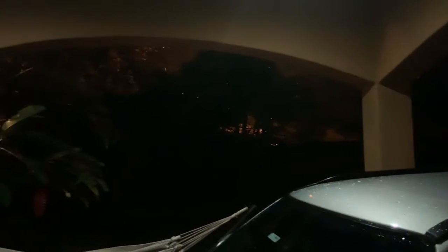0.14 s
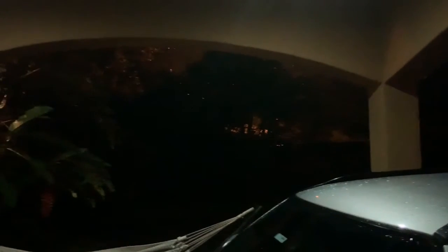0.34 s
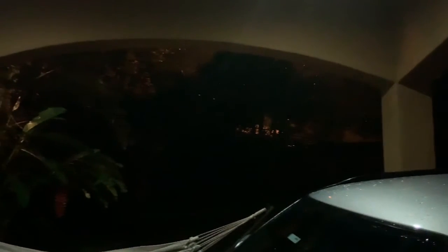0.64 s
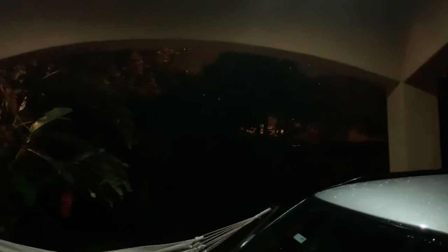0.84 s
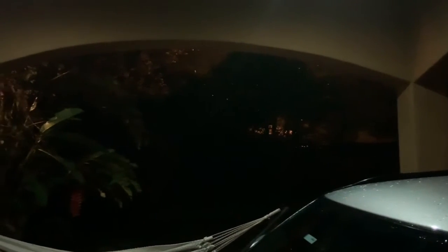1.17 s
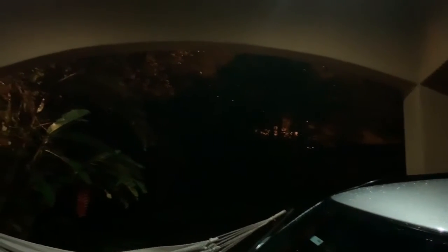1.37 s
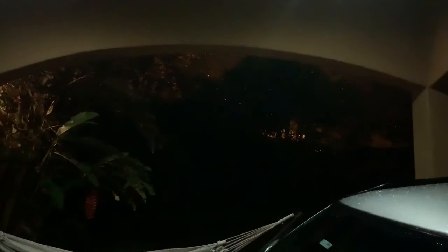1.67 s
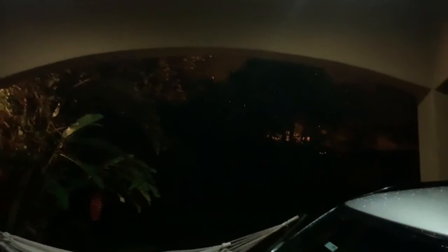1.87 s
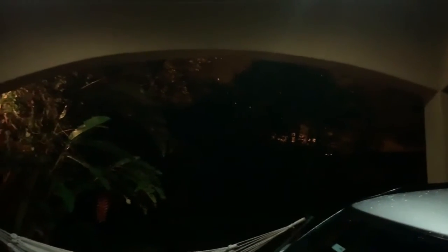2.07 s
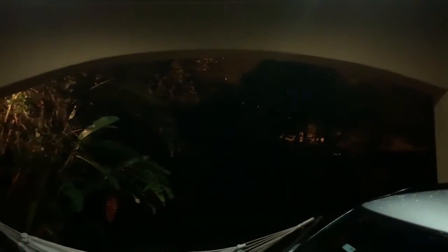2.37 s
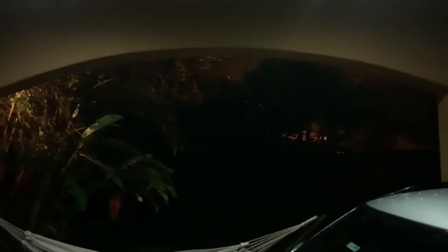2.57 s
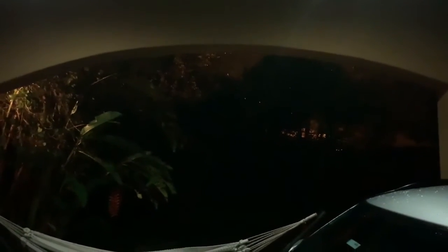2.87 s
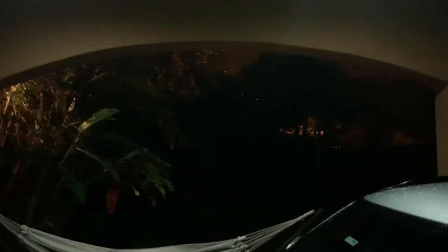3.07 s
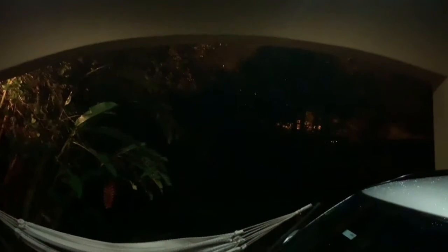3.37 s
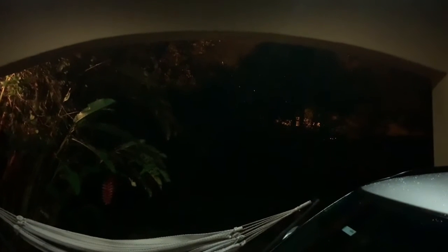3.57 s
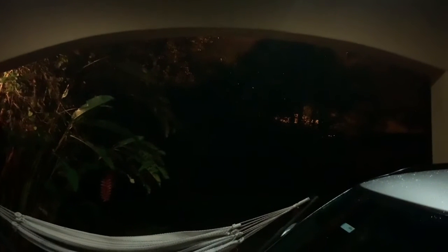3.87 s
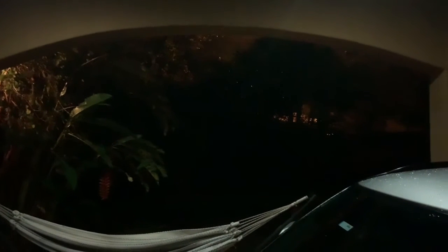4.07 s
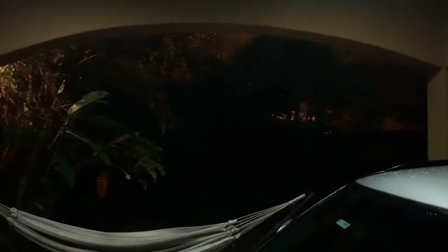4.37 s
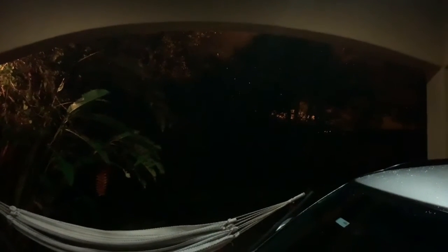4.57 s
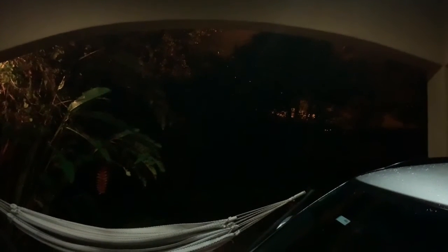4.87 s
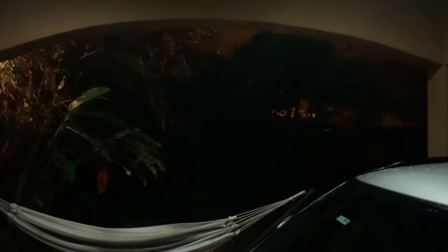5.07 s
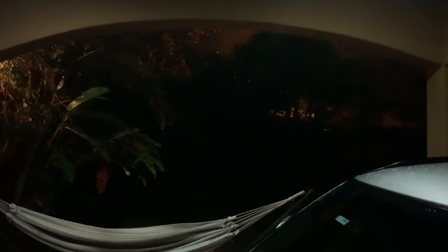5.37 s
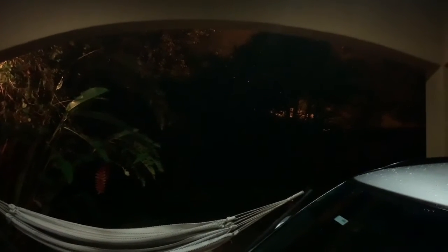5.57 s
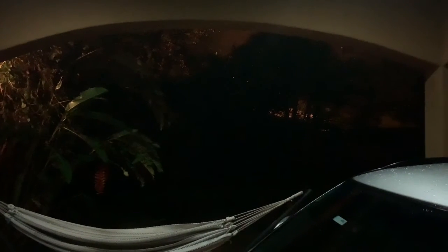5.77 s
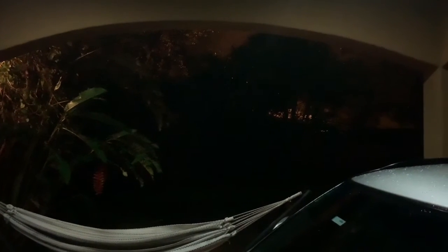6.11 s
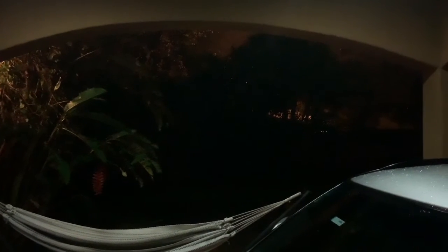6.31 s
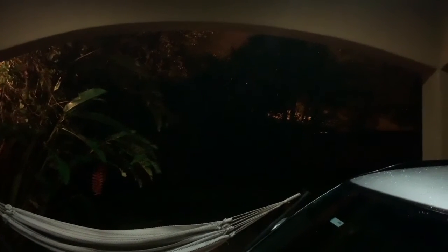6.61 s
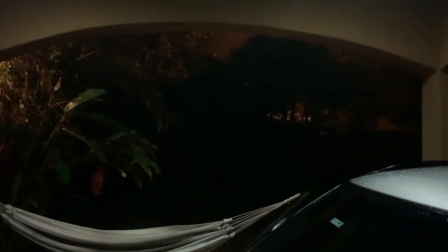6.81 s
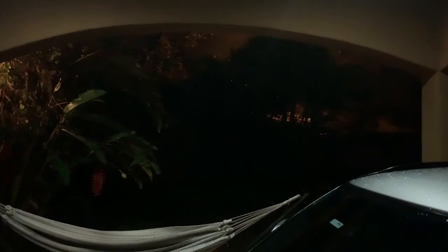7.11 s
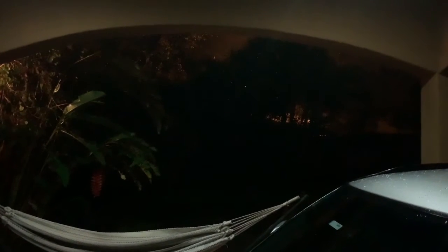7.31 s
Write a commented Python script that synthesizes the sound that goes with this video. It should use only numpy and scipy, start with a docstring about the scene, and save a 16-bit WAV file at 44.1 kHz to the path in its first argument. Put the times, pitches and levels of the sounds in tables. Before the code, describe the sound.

Throughout about 7.5 seconds, a handful of night insects trill without pause in a garden beside a hard-walled porch. The sound is a shrill, rough buzz near 6 kHz with a fainter glassy octave above, pulsing about 133 times a second; the singers' rates slide apart and meet, so the chorus shimmers and beats. It leans a little to the right, blurred by leaves and short porch echoes, with fainter singers far behind. Underneath are very quiet airy hiss, a distant traffic-like rumble and barely audible low wavering hums. Faint ticks fall at 1.5, 2.0 and 2.2 seconds. At 2.65 a small, hollow knock rattles briefly, followed by a light snap at 2.93. Sparse dull and thin high ticks continue from 3.3 to 7.3, clearest near 5.1. The rumble swells gently around 4.9, then eases. A very faint double knock comes at 7.0; the trill carries on to the end.

```python
"""Five insects buzz in a garden at night, heard from a hard-walled porch, with three more farther off.
Each clicks about 133 times a second into a body ringing near 6 kHz; their rates drift apart and meet again.
Under them: a far rumble and hiss of filtered noise, and faint gliding sine tones.
Two knocks, one snap and a few small ticks are bursts of dying modes with porch echoes."""
import sys
import numpy as np
from scipy import signal
from scipy.fft import rfft, irfft, next_fast_len
from scipy.io import wavfile
from scipy.ndimage import uniform_filter1d

SR = 44100
rng = np.random.default_rng(int(sys.argv[2]) if len(sys.argv) > 2 else 0)


def transcribe(signal):
    """Save signal, clipped to [-1, 1], as a 16-bit WAV file at the path in sys.argv[1]."""
    frames = np.atleast_2d(signal).T
    limited = np.clip(frames, -1, 1)
    pcm = np.round(limited * 32767).astype(np.int16)
    wavfile.write(sys.argv[1], SR, pcm)


N = 328545
SIZE = next_fast_len(N + SR)  # room for the echoes to die away
HZ = np.fft.rfftfreq(SIZE, 1 / SR)
T = np.arange(N) / SR

# colour of one click, a main ring and its octave: (f/Hz, relative level/dB)
CLICK_COLOUR = [(4400, -46.5), (5050, -25), (5260, -15.5), (5450, -9), (5800, -3), (6100, -1.5), (6300, 5),
                (6500, 2), (6750, -1.5), (7050, -17), (7600, -26), (9200, -39), (10300, -51.5),
                (11300, -37.5), (12300, -25.5), (13300, -31), (14200, -51.5)]
# echoes against straight sound: (f/Hz, level/dB)
ECHO_SHARE = [(4700, -1), (5200, -7), (5500, -2), (6100, 4), (7000, 0), (9000, -2), (12400, -8)]


def gain_of(db):
    """Decibels to an amplitude factor."""
    return 10 ** (np.asarray(db) / 20)


def evened(x):
    """Scales to rms 1."""
    return x / np.sqrt(np.mean(x ** 2) + 1e-20)


def read(points, hz):
    """A spectrum, straight on a log frequency axis."""
    f, value = np.transpose(points)
    return np.interp(np.log(hz + 1), np.log(f + 1), value)


def over_time(points):
    """A curve over time, straight between its points."""
    return np.interp(T, *np.transpose(points))


def wander(top_hz):
    """Slow chance of rms 1: sines of random phase up to top_hz, the slower ones stronger."""
    t = T[::64]
    slow = 0
    for f in np.geomspace(top_hz / 20, top_hz, num=16):
        slow = slow + np.sin(2 * np.pi * (f * t + rng.random())) / np.sqrt(f)
    return np.interp(T, t, evened(slow))


def echoes(t60, first_s):
    """Spectrum of dying scattered echoes of energy 1, other ones for each port."""
    t = np.arange(SR // 2) / SR
    tail = rng.standard_normal((2, len(t))) * gain_of(-60 * t / t60) * (t > first_s)
    return rfft(tail / np.linalg.norm(tail, axis=1, keepdims=True), SIZE)


def left_port_path(hz):
    """Delay and phase of the straight path at the left port, against the right."""
    lag_s = 33 / SR  # the garden lies to the right: the left port hears it later
    # the housing turns the phase of the far port: (f/Hz, phase/rad)
    port_turn = [(1400, 1.5), (2760, .7), (4130, 3.2), (5300, 2.6), (7050, 2.1), (9000, 0)]
    return np.exp(-2j * np.pi * hz * lag_s + 1j * read(port_turn, hz))


def rumble():
    """Low noise that swells like far traffic; nearly the same at both ports."""
    # slow swell: (t/s, level/dB)
    swell = [(0, -58), (1.6, -58.5), (2.2, -62.5), (3.4, -55), (4.2, -52.5), (4.9, -47), (5.4, -51),
             (5.8, -50.5), (7.0, -54.5), (7.45, -53.5)]
    # colour: (f/Hz, relative level/dB)
    colour = [(12, -40), (20, -35), (47, -0.5), (76, -1), (92, -1.5), (118, -8.5), (200, -20), (260, -47),
              (440, -120)]
    gust_db, gust_hz = 0.5, 9.6  # the rumble comes in lumps
    a, b = rng.standard_normal((2, SIZE))
    pair = rfft(np.array([a + 0.12 * b, a - 0.066 * b]))
    low = irfft(pair * gain_of(read(colour, HZ)) * (HZ < 200), SIZE)[:, :N]
    return evened(low) * gain_of(over_time(swell) + gust_db * wander(gust_hz))


def tones():
    """Sines that each glide in pitch, waver in pitch and level, and fade in and out."""
    # glides: (start t/s, end t/s, start f/Hz, end f/Hz, rms pitch waver/Hz, level/dB)
    glides = [(0, 3.3, 127, 120, 5, -66), (1.1, 2.7, 290, 270, 4, -73), (3.3, 4.3, 335, 370, 3, -76),
              (3.7, 4.25, 117, 122, 1.5, -59), (4.2, 4.65, 124, 132, 2, -65), (4.8, 5.9, 246, 240, 2, -73),
              (4.9, 6.3, 188, 182, 2, -70), (3.9, 4.8, 300, 330, 3, -75), (4.2, 7.1, 225, 200, 2, -72),
              (5.4, 5.85, 87, 85, 2, -56), (5.85, 6.7, 90, 85, 5, -62), (6.84, 6.98, 1750, 1400, 120, -68)]
    out = np.zeros(N)
    for start, end, from_hz, to_hz, width, db in glides:
        hz = np.interp(T, (start, end), (from_hz, to_hz)) + width * wander(top_hz=5 * width)
        fade = np.clip(np.minimum(T - start, end - T) / (end - start) * 5, 0, 1)
        sine = np.sqrt(2) * np.sin(2 * np.pi * np.cumsum(hz) / SR)
        out += gain_of(db + 5.2 * wander(top_hz=6.6)) * fade * sine
    return out


def night():
    """Broad hiss, filtered noise of level uneven over time and frequency, partly from the garden side."""
    # colour: (f/Hz, relative level/dB)
    colour = [(90, -5), (150, 0), (250, -5.5), (480, -10), (900, -11.5), (1600, -10.5), (2300, -14.5),
              (3600, -18), (4250, -18), (4600, -7), (5200, -9), (8000, -9.5), (9300, -12), (10200, -17),
              (13500, -34), (14200, -7), (15600, -41)]
    # how alike the two ports are: (f/Hz, likeness 0-1)
    likeness = [(100, 0.81), (300, 0.84), (500, 0), (950, 0.6), (1200, 0.46), (1700, 0.46), (2900, 0.71),
                (3500, 0), (10000, 1)]
    level_db = -51.5
    frames, hz = N // 256 + 5, np.fft.rfftfreq(1024, 1 / SR)
    a, b, c, d, uneven = rng.standard_normal((frames, 513, 5)).T
    uneven = uniform_filter1d(uneven, 14, axis=0)  # across frequency
    uneven = evened(uniform_filter1d(uneven, 12, axis=1))  # across time
    flicker = evened(uniform_filter1d(rng.standard_normal(frames), 6))
    same = np.clip(read(likeness, hz), 0, 1)[:, None]
    late = np.where(hz > 1100, left_port_path(hz), 1)[:, None]  # the bass comes from all round
    right = a + 1j * b
    left = same * late * right + np.sqrt(1 - same ** 2) * (c + 1j * d)
    low_cut_db = 40 * (hz < 60)[:, None]
    shape_db = read(colour, hz)[:, None] + 1.8 * uneven + .8 * flicker - low_cut_db
    z = np.array([left, right]) * gain_of(shape_db)
    return gain_of(level_db) * evened(signal.istft(z, nperseg=1024, noverlap=768)[1][:, :N])


def struck(blows, rise_s):
    """Spectrum of blows (t/s, peak/dB, modes), each a sum of dying sines."""
    t, out = np.arange(2000) / SR, np.zeros(SIZE)
    for s, db, modes in blows:
        ring = np.zeros(len(t))
        for k, (f, width, mode_db) in enumerate(modes):
            dying = np.sin(2 * np.pi * f * t) * np.exp(-np.pi * width * t)
            ring += (-1) ** k * gain_of(mode_db) * dying
        ring *= 1 - np.exp(-t / rise_s)
        out[round(s * SR):][:len(t)] += gain_of(db) * ring / abs(ring).max()
    return rfft(out)


def taps():
    """Knocks, a snap and ticks ring their modes, each with its own share of porch echoes."""
    # a knock and its rattle, then a faint one: (t/s, peak/dB)
    knocks = [(2.645, -31.5), (2.652, -42), (2.663, -37.5), (2.678, -47), (2.69, -39.5), (2.705, -47),
              (2.722, -42), (7.012, -49), (7.027, -48.5), (7.044, -59)]
    # knock modes: (f/Hz, width/Hz, relative level/dB)
    knock_modes = [(307, 65, -19), (720, 190, -3.5), (920, 103, -3.5), (1470, 245, -2), (2310, 600, -2.5),
                   (2900, 550, 1), (4150, 630, -2)]
    # the snap: (t/s, peak/dB)
    snaps = [(2.9315, -41), (2.9345, -44), (2.9385, -43)]
    # snap modes: (f/Hz, width/Hz, relative level/dB)
    snap_modes = [(950, 250, -12), (1580, 300, -11), (2310, 160, -4), (2750, 130, 1), (3410, 500, -5),
                  (4160, 150, -6), (4560, 90, -3)]
    # dull ticks, some mostly echo: (t/s, peak/dB, f/Hz, echo blow over dry blow/dB)
    ticks = [(1.476, -48, 1490, 12), (2.229, -46, 889.5, 10), (3.308, -44, 1800, 9), (4.324, -43, 2060, 5),
             (6.3166, -43, 1360, 1), (6.439, -48.5, 1520, 10.5)]
    # thin high ticks: (t/s, peak/dB)
    pings = [(2.0328, -36), (4.126, -47), (4.2694, -41), (5.1362, -34), (5.1994, -42), (6.628, -43),
             (7.3416, -40)]
    # thin tick modes: (f/Hz, width/Hz, relative level/dB)
    ping_modes = [(10000, 900, -9), (12200, 700, -4), (13400, 450, 0), (14500, 450, 1), (15500, 600, -2)]
    tick_width_hz = 930
    knock_echo_db, snap_echo_db, ping_echo_db = 5.5, -2, 8  # echoes over straight sound

    porch = echoes(t60=.2, first_s=.002)
    knock = struck([(*row, knock_modes) for row in knocks], rise_s=0.00099)
    snap = struck([(*row, snap_modes) for row in snaps], rise_s=.001)
    ping = struck([(*row, ping_modes) for row in pings], rise_s=0.00017)
    dry_ticks, echo_ticks = [], []
    for s, db, hz, echo_db in ticks:
        dry_ticks.append((s, db, [(hz, tick_width_hz, 0), (2 * hz, tick_width_hz, -3)]))
        echo_ticks.append((s, db + echo_db, [(hz, tick_width_hz, 0)]))
    out = knock * (1 + gain_of(knock_echo_db) * porch)
    out += snap * (1 + gain_of(snap_echo_db) * porch)
    out += struck(dry_ticks, rise_s=0.00086)
    out += struck(echo_ticks, rise_s=0.00014) * porch
    out += ping * (1 + gain_of(ping_echo_db) * porch)
    return irfft(out, SIZE)[:, :N]


def clicks(rate, jitter, uneven_db):
    """A band-limited click at every turn; each a little early or late (in turns), strong or weak."""
    chance = rng.standard_normal((1100, 2))  # a row for each click
    turns = np.cumsum(rate) / SR + rng.random()
    turns = turns + jitter * np.interp(turns, np.arange(1100), chance[:, 0])
    angle = np.pi * ((turns + .5) % 1 - .5) + 1e-9
    pulse = np.sin(301 * angle) / np.sin(angle)  # 150 equal harmonics
    return pulse * gain_of(uneven_db * chance[np.round(turns).astype(int), 1])


def stirring():
    """Shares of three sets of echo paths, fading into each other as air and leaves stir; powers sum to 1."""
    stir_hz, steady = 4.0, 1.2  # top speed of the changes; weight of the set that stays, before scaling
    weights = np.array([steady * np.ones(N), wander(stir_hz), wander(stir_hz)])
    return weights / np.linalg.norm(weights, axis=0)


def ongoing(train, rate):
    """Spectrum of a song that began earlier: its first clicks also wrap round to just before time zero."""
    before = train[:round(20 * SR / rate)]
    return rfft(np.concatenate([train, np.zeros(SIZE - N - len(before)), before]))


def far_insects():
    """Spectrum of the distant singers: click trains heard by echoes alone."""
    count, level_db, rate_hz = 3, -56, 133.5  # level of each, before the click colour and echo path
    share, body = gain_of(read(ECHO_SHARE, HZ)), gain_of(read(CLICK_COLOUR, HZ))
    song = 0
    for _ in range(count):
        train = evened(clicks(rate_hz + 1.6 * wander(top_hz=.6), jitter=0.001, uneven_db=4))
        path = echoes(t60=0.42, first_s=0) * share / share.max()
        song = song + gain_of(level_db) * rfft(train, SIZE) * path * body
    return song


def near_insects():
    """Spectrum of the near singers: click trains straight from the garden side and by porch echoes."""
    # pace of each singer, slow sags and quicker surges: one list each of (t/s, rate/Hz)
    paces = [
        [(0, 133.3), (.3, 133.12), (1.4, 133.08), (1.6, 133.2), (1.9, 133.58), (2.5, 133.74), (2.88, 134.72),
         (3.07, 135.05), (3.2, 135.55), (3.85, 134.75), (4, 134.36), (4.7, 133.48), (5, 133.52), (5.7, 133.03),
         (6.2, 132.97), (7.45, 133.2)],
        [(0, 132.5), (.3, 132.8), (.55, 132.86), (.7, 133.05), (.95, 132.85), (1.2, 132.82), (1.75, 133.3),
         (2.6, 132.68), (3.25, 132), (3.45, 131.98), (3.65, 131.78), (4.8, 131.24), (4.92, 131.72),
         (5.1, 131.53), (5.5, 132.44), (5.9, 132.98), (6.65, 133.02), (7.45, 132.32)],
        [(0, 134.3), (.2, 134.5), (.5, 135.28), (.82, 135.58), (2.3, 134.5), (3.65, 133.92), (4, 135.09),
         (4.4, 135.62), (4.74, 135.5), (4.92, 135.6), (5.3, 135.12), (6.05, 134.6), (7.2, 134.05),
         (7.45, 134.2)],
        [(0, 132.65), (.4, 133.15), (1, 134.78), (1.35, 134.9), (2.05, 134.3), (2.9, 133.2), (3.45, 132.8),
         (4, 132.6), (4.75, 133.8), (5.27, 134.27), (6.1, 133.4), (7.45, 132.7)],
        [(0, 132.3), (1.2, 132.7), (2.8, 132), (3.6, 132.1), (4, 132.6), (4.6, 133.05), (5.1, 133),
         (5.6, 132.35), (7.2, 131.6), (7.45, 131.6)],
    ]
    # singers: (level/dB, ring pitch as a factor on the click colour)
    singers = [(-32.5, 0.9866), (-34, 0.996), (-42.5, 1.048), (-42, 0.988), (-40.5, 1.0356)]
    # shared level curve: (t/s, level/dB)
    chorus = [(0, 0.5), (1, 1), (1.7, -0.5), (3, 0), (4, -0.5), (5, -0.5), (5.5, 0), (6, -1.5), (7.45, -1)]
    ease_s = .1  # a change of pace is spread over this long
    wobble, wobble_hz = .06, 5  # rms tremble of the pace in clicks per s, and its top speed
    swell_db, swell_hz = .8, 1  # each singer swells and fades by itself
    leaves_db = 4  # sound scattered by the garden over the straight sound

    share = gain_of(read(ECHO_SHARE, HZ))
    straight = np.array([left_port_path(HZ), np.ones(len(HZ))])
    song = 0
    for pace, (level_db, factor) in zip(paces, singers):
        eased = uniform_filter1d(over_time(pace), round(ease_s * SR), mode="nearest")
        rate = eased + wobble * wander(wobble_hz)
        train = evened(clicks(rate, jitter=0.001, uneven_db=1.6))
        drift_db = swell_db * wander(swell_hz) + 0.34 * wander(top_hz=11)
        train *= gain_of(level_db + over_time(chorus) + drift_db)
        ring = gain_of(read(CLICK_COLOUR, HZ / factor)) / np.sqrt(1 + share ** 2)
        for weight in stirring():
            # leaves and walls far off smear the click alike for both ports
            smeared = 1 + gain_of(leaves_db) * echoes(t60=0.21, first_s=0)[0]
            smeared = smeared / np.sqrt(1 + gain_of(2 * leaves_db))
            path = straight * smeared + share * echoes(t60=0.25, first_s=0.0017)
            song = song + ongoing(train * weight, rate[0]) * path * ring
    return song


def insects():
    """Near and far singers together; the octave of their ring changes level by itself."""
    # the upper ring fades as the microphone turns: (t/s, level/dB)
    octave = [(0, 5), (2.2, 3.5), (2.5, 1), (5, 2), (7.45, 2.5)]
    song = near_insects() + far_insects()
    upper = HZ > 10300
    main_ring = irfft(song * ~upper, SIZE)[:, :N]
    upper_ring = irfft(song * upper, SIZE)[:, :N]
    both = main_ring + gain_of(over_time(octave)) * upper_ring
    body = gain_of(read(CLICK_COLOUR, HZ))
    return both / np.sqrt(np.mean(body ** 2))


def scene():
    """All sources at the two ports."""
    return rumble() + tones() + night() + taps() + insects()


def record(dry):
    """The ports differ a little in colour; then the band limit."""
    # colour difference of the ports: (f/Hz, left minus right/dB)
    port_tilt = [(60, -0.5), (130, 2.5), (290, -2.5), (640, 2.5), (1410, 0.5), (3100, -0.5), (6820, 1),
                 (15000, 0)]
    edge_hz = 15700
    tilt = gain_of(read(port_tilt, HZ) * np.array([[.5], [-.5]]))
    wet = irfft(rfft(dry, SIZE) * tilt, SIZE)[:, :N]
    low_pass = signal.firwin(1501, edge_hz, window=("kaiser", 9), fs=SR)
    return signal.oaconvolve(wet, low_pass[None], "same")


dry = scene()
out = record(dry)
transcribe(out)
```